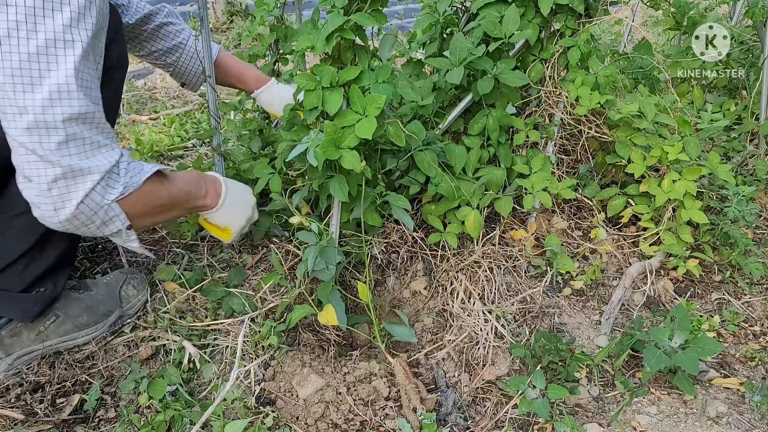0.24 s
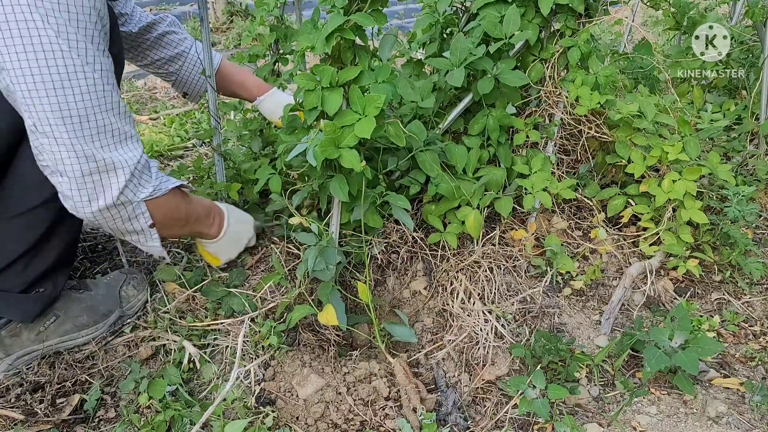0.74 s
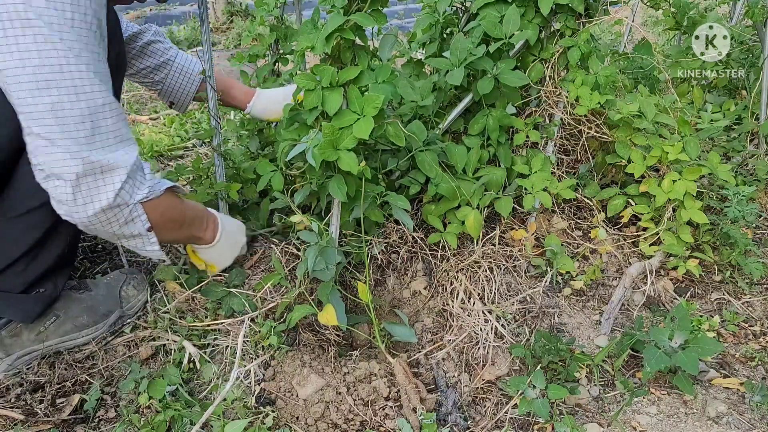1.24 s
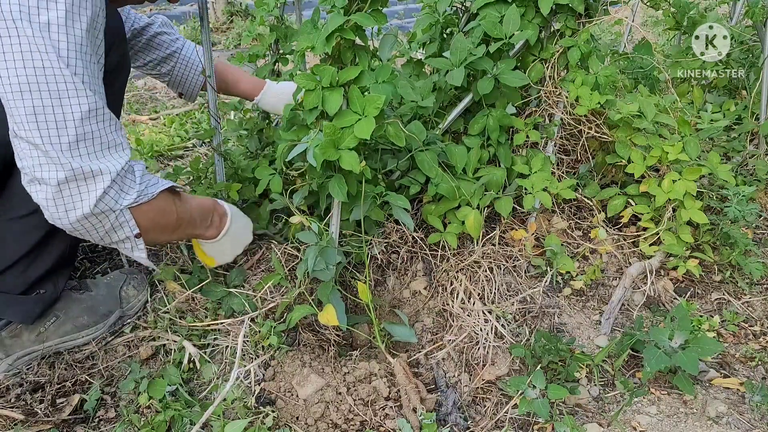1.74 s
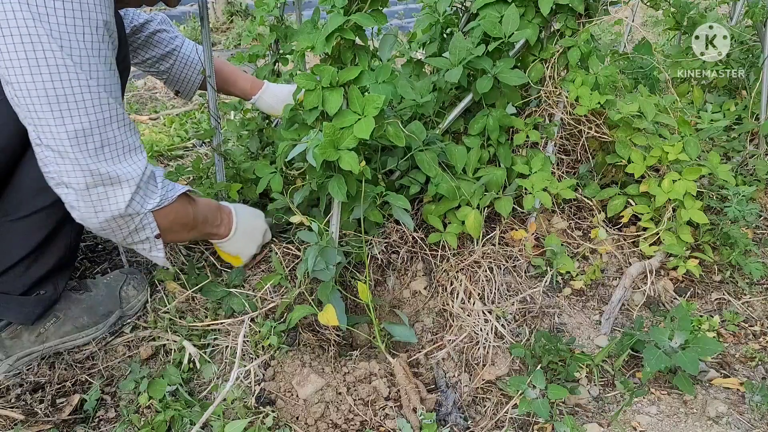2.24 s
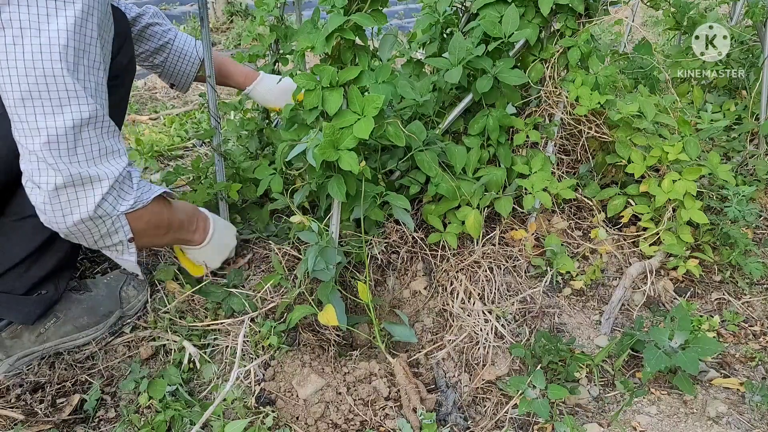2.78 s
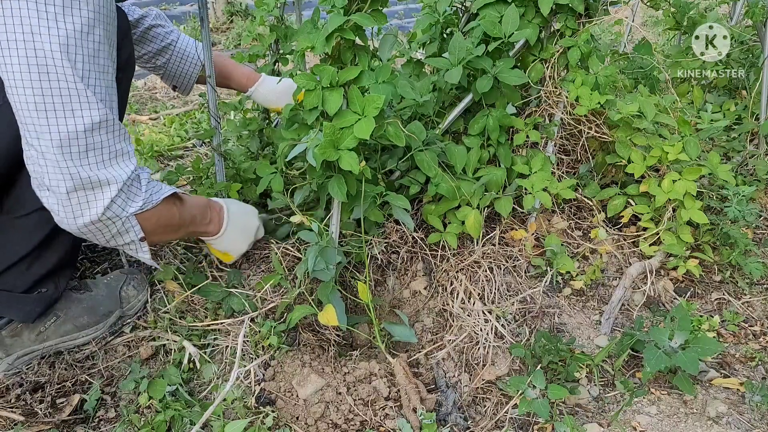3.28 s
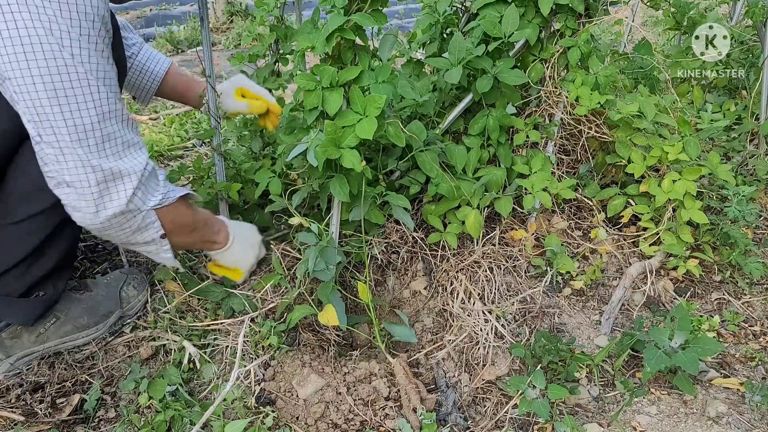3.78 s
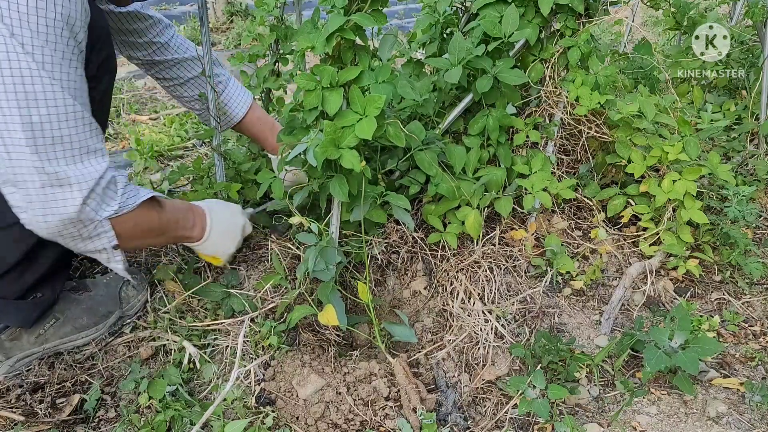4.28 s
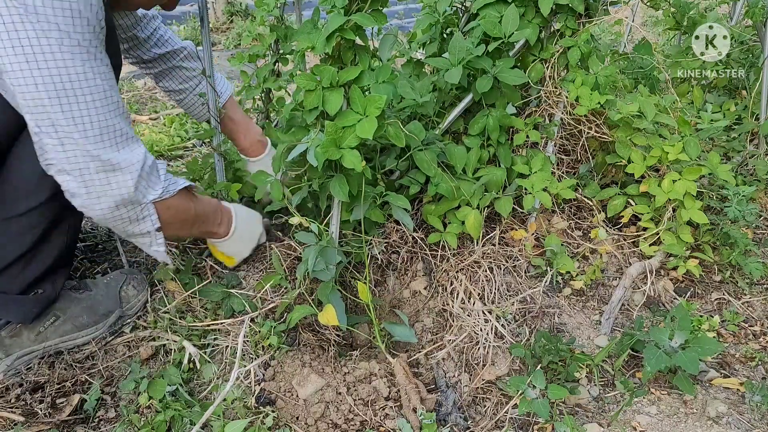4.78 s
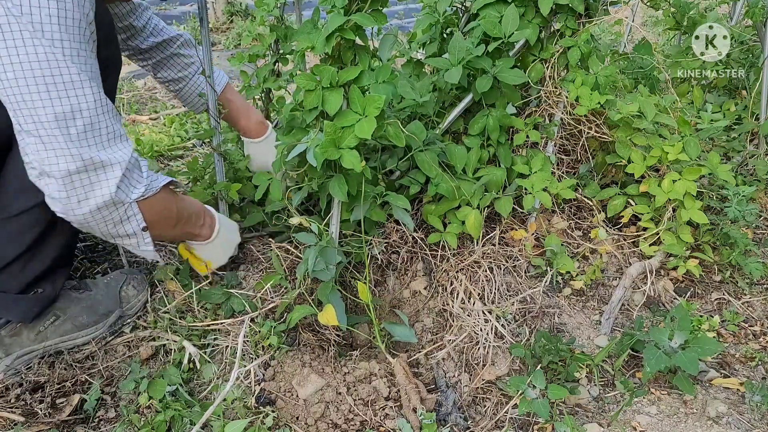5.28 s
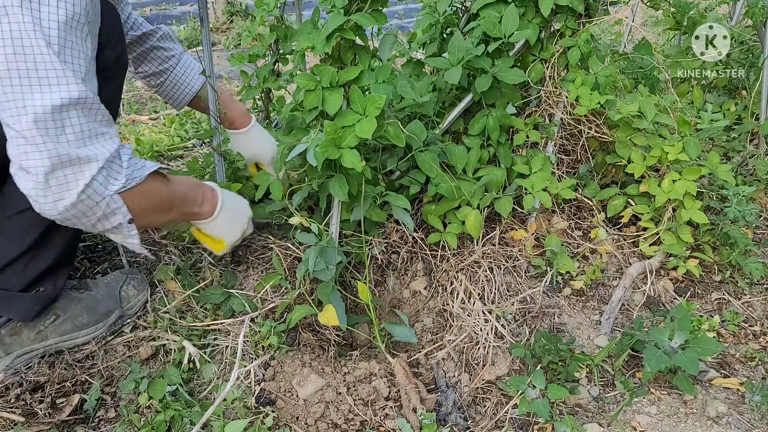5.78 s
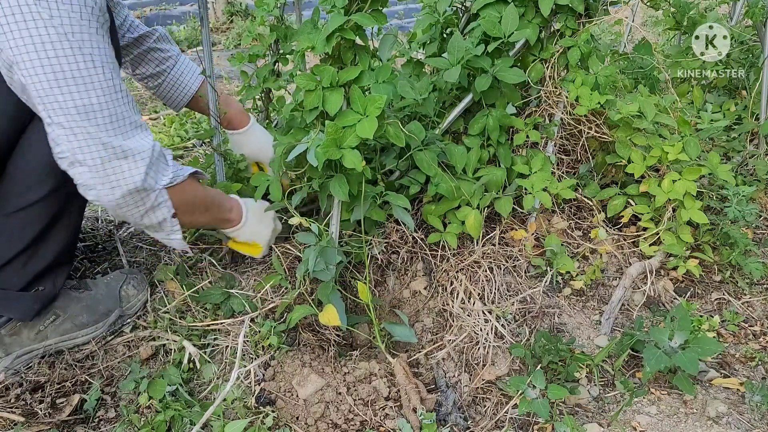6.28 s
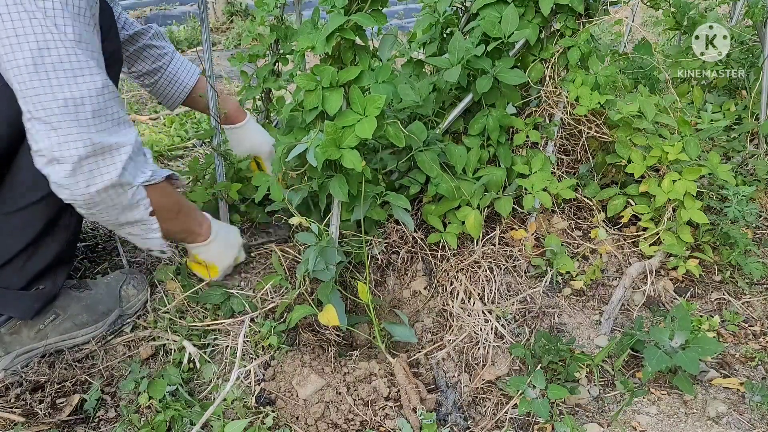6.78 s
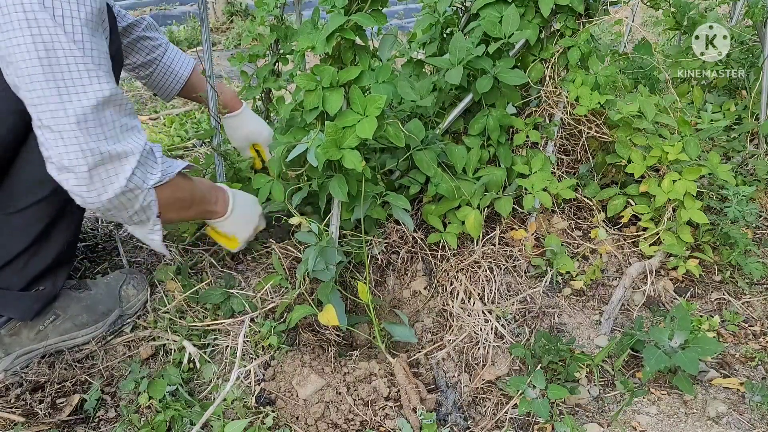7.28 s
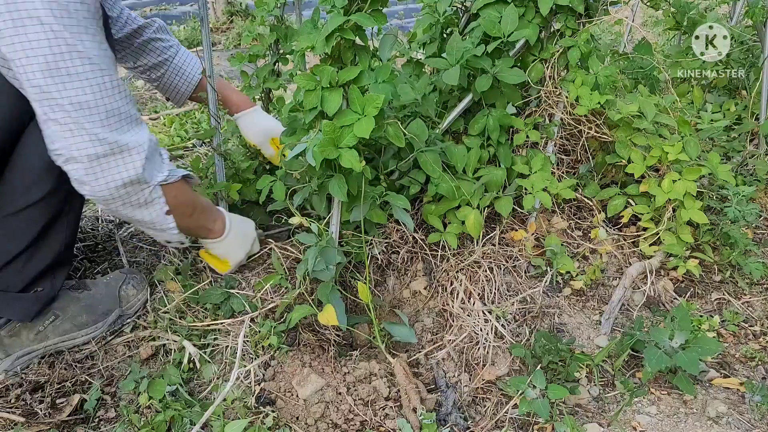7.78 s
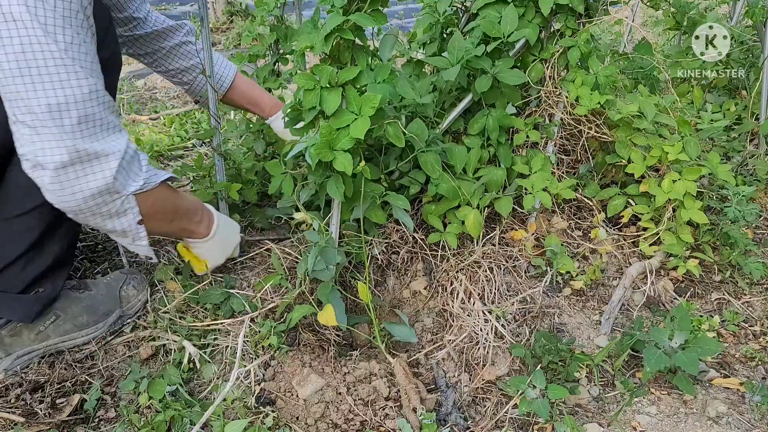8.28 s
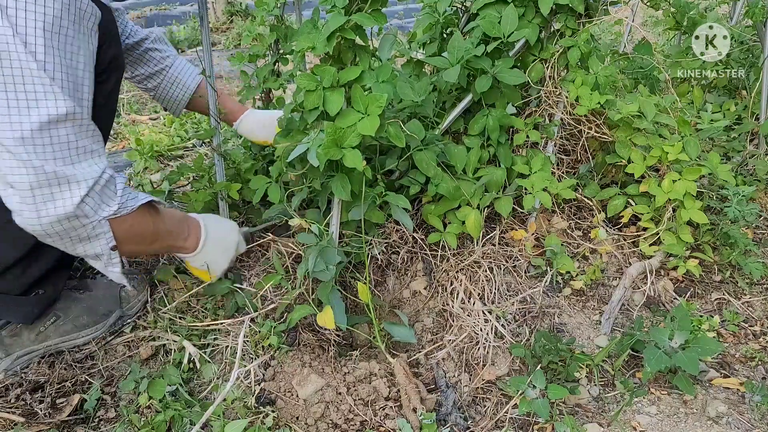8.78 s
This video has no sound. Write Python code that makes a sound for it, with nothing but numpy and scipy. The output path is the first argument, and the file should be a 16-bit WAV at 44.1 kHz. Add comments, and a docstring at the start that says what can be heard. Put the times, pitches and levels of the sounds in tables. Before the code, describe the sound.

Quick, uneven gardening strokes rasp through weeds and loose earth, stems cracking and the tool lightly thudding, against still outdoor air.

```python
"""A gardener's small steel cutting tool works through weeds at soil level, nearly three strokes a second.
Shaped noise and separate fractures make the crunch of dry stalks and crumbly earth; stems snap as short
ringing bursts, the tool bumps the ground as damped sines plus grit, and the blade rings in decaying modes.
Behind it: still outdoor air and stirring leaves as noise, a low harmonic hum, a far bird as gliding sines."""
import sys
import numpy as np
from scipy import signal
from scipy.fft import rfft, irfft
from scipy.io import wavfile
from scipy.ndimage import uniform_filter1d

SR = 44100
rng = np.random.default_rng(int(sys.argv[2]) if len(sys.argv) > 2 else 0)


def to_wav(s):
    """Save 16-bit WAV."""
    ch = np.atleast_2d(s).T  # columns
    pcm = np.round(np.clip(ch, -1, 1) * 32767)  # PCM
    wavfile.write(sys.argv[1], SR, pcm.astype(np.int16))


N = 398663

# spectral shape of dry stalks and leaves: [f/Hz, relative level/dB]
STALK_SPECTRUM = [(150, -31), (1200, -3), (2300, -4), (2850, 0.5), (4000, -4.5), (5300, -0.5), (6200, 0),
                  (7700, 0), (9300, -0.5), (11000, 2), (12300, -4), (14500, -4.5), (16000, -7.5)]
# spectral shape of crumbly soil and woody knocks: [f/Hz, relative level/dB]
SOIL_SPECTRUM = [(60, -11), (170, -7.5), (230, -7.5), (330, -6.5), (460, 0), (650, -5), (950, -6),
                 (1380, -6), (1700, -2), (2300, -9.5), (3200, -13), (6000, -15.5), (16000, -51)]
# modes of the free steel blade: [f/Hz, relative level/dB, t60/s]
BLADE_MODES = [(1377, 10.5, 0.053), (2735, -1.5, 0.19), (3057, 4, 0.14), (3800, 0, 0.17), (4380, -3, 0.23),
               (6950, -1.5, 0.28), (7580, 4, 0.037), (8400, 3, 0.15), (10600, -30, 0.091),
               (11700, 8, 0.071), (11700, -21, 0.072), (13800, -35, 0.11), (14630, -12, .12)]


def amp(db):
    """Decibels to gain."""
    return 10 ** (np.asarray(db) / 20)


def evened(x):
    """Scales to rms 1."""
    return x / np.sqrt(np.mean(x ** 2) + 1e-20)


def read(points, hz):
    """Interpolates a table on a log-frequency axis."""
    f, value = np.transpose(points)
    return np.interp(np.log(hz + 1), np.log(f + 1), value)


def add(mix, s, sound):
    """Mixes a sound in at time s, in place."""
    part = mix[max(round(s * SR), 0):][:len(sound)]
    part += sound[:len(part)]


def colour(x, spectrum, size=2048):
    """Minimum-phase FIR of unit energy with the given spectral shape."""
    hz = abs(np.fft.fftfreq(size, 1 / SR))
    log_gain = np.log(amp(read(spectrum, hz)))
    response = np.exp(np.conj(signal.hilbert(log_gain)))
    taps = np.fft.ifft(response).real[:size // 2]
    return signal.oaconvolve(x, taps[None] / np.linalg.norm(taps), axes=1)[:, :N]


def burst(power, spectrum):
    """Two unrelated noises that follow one power envelope, then are filtered by one spectrum."""
    envelope = np.sqrt(np.maximum(power, 0))
    return colour(envelope * rng.standard_normal((2, N)), spectrum)


def drift(per_s):
    """Slow chance of rms 1: sines of random phase up to per_s Hz, weaker as they get faster."""
    t = np.arange(0, N, 100) / SR
    rates_hz = np.geomspace(per_s / 10, per_s, 20)
    slow = sum(np.sin(2 * np.pi * (f * t + rng.random())) / np.sqrt(f) for f in rates_hz)
    return evened(np.interp(np.arange(N) / SR, t, slow))


def grains(per_s, spread_db, decay_s, smooth):
    """Power envelope of many tiny fractures of uneven size over a smooth rub; mean 1."""
    sizes = amp(spread_db * np.minimum(rng.exponential(1, N), 4)) ** 2
    sizes *= rng.random(N) < per_s / SR
    power = signal.lfilter([1], [1, -np.exp(-1 / (decay_s * SR))], sizes)
    power /= uniform_filter1d(power, size=2200) + power.mean() / 20  # levels out chance clusters
    share = np.clip(smooth, 0, 1)
    return share + (1 - share) * power / power.mean()


def fibres(per_s, spread_db, decay_s, count=16):
    """Separate little fractures, each a brief splinter of noise in one of count shapes; rms 1."""
    t, out = np.arange(160) / SR, np.zeros((2, N + 160))
    for shapes in rng.standard_normal((count, 2, len(t))) * np.exp(-t / decay_s):
        events = rng.random((round(per_s * N / SR / count), 2))  # position, size
        starts = (events[:, :1] * N).astype(int)
        size = amp(spread_db * np.minimum(-np.log(events[:, 1]), 2.5))
        for side, shape in zip(out, shapes):
            np.add.at(side, starts + np.arange(len(t)), size[:, None] * shape)
    out = out[:, :N]
    local = uniform_filter1d((out ** 2).mean(0), size=1500)
    return evened(out / np.sqrt(abs(local) + local.mean() / 10))


def ports(x, likeness):
    """Two unrelated signals become the partly alike, phase-shifted signals of two microphone ports."""
    # phase by which left leads right: [f/Hz, phase/rad]
    lead_points = [(100, 0.13), (480, .6), (1000, 2.85), (1400, 0.83), (1800, 1.4), (2300, 2.13),
                   (3000, 2.74), (3800, 2.93), (6000, 5.18), (8300, 4.7), (12000, 5)]
    # left minus right: [f/Hz, level/dB]
    balance_points = [(100, 1.1), (300, 2.9), (650, 4.1), (1400, 3.1), (2500, 2.1), (9000, 1.44),
                      (15000, 2.5)]
    hz, (a, b) = np.fft.rfftfreq(N, 1 / SR), rfft(x)
    same = np.clip(read(likeness, hz), 0, .98)
    lead = read(lead_points, hz)
    right = same * np.exp(-1j * lead) * a + np.sqrt(1 - same ** 2) * b
    tilt = amp(read(balance_points, hz) / 2)
    centre = np.sqrt((1 + same * np.cos(lead)) / 2)  # keeps the level of the ports' mean, tilt aside
    return irfft(np.array([a * tilt, right / tilt]) / centre, N)


def background(air_db=-66, leaves_db=-70):
    """Still air, and leaves that stir under the other hand: drifting noise, the leaves' part grainy."""
    # spectral shape of outdoor air: [f/Hz, relative level/dB]
    air_spectrum = [(15, -43), (30, -30), (45, 1), (65, 7), (95, 7.5), (160, -8.5), (220, -13.5),
                    (380, -4.5), (600, -5.5), (950, -11.5), (1500, -9), (2300, -13), (4800, -15.5),
                    (11000, -46), (15500, -65)]
    swell_db, stir_db = .3 * drift(3), 1.3 * drift(8)
    air = burst(amp(air_db + swell_db) ** 2, air_spectrum)
    ticks = grains(per_s=39, spread_db=-2.5, decay_s=0.0029, smooth=0.79)
    return air + burst(amp(leaves_db + stir_db) ** 2 * ticks, STALK_SPECTRUM)


def hum(hum_hz=120.6, hum_db=-64.5, overtone_db=-23):
    """Electric hum: harmonics 1 and 3-6 on a slightly wandering phase, opposite in sign left and right."""
    turn = 2 * np.pi * hum_hz * np.arange(N) / SR + .08 * drift(3)
    tone = np.sin(turn) + amp(overtone_db) * sum(np.sin(k * turn) for k in range(3, 7))
    return amp(hum_db) * evened(tone) * amp([[1.], [-1.]])


def garden(x, echo_db=-13, t60=0.049):
    """Leaves and ground scatter a short tail: decaying noise after a 3 ms gap."""
    t = np.arange(SR // 3) / SR
    tail = rng.standard_normal((2, len(t))) * amp(-60 * t / t60) * (t > .003)
    return amp(echo_db) * signal.oaconvolve(x, tail / np.linalg.norm(tail[0]), axes=1)[:, :N]


def bird(waver=0.014):
    """Thin far whistles: wavering sines that rise and level off, blurred by the foliage."""
    # whistles: [t/s, length/s, start f/Hz, end f/Hz, level/dB]
    whistle_rows = [(3.29, .08, 3930, 5300, -69), (4.656, .15, 4790, 5440, -71),
                    (7.677, .09, 3820, 4100, -71), (8.595, .065, 3800, 4550, -69),
                    (8.76, .04, 3900, 3980, -71)]
    out = np.zeros(N)
    for s, length, start_hz, end_hz, db in whistle_rows:
        u = np.linspace(0, 1, round(length * SR))
        glide_hz = end_hz + (start_hz - end_hz) * (1 - np.sin(np.pi * u / 2))
        hz = glide_hz * (1 + waver * drift(146)[:len(u)])
        envelope = amp(db) * np.sqrt(abs(np.sin(np.pi * u)))
        add(out, s, envelope * np.sin(2 * np.pi * np.cumsum(hz) / SR))
    far = np.array([out, out])
    return far + garden(far, echo_db=-1, t60=0.2)


def blade_ring(weights, damping):
    """Sum of the blade's decaying modes, one weight each; contact (damping > 1) shortens them."""
    t = np.arange(SR // 3) / SR
    return sum(w * amp(db - 60 * damping * t / t60) * np.cos(2 * np.pi * hz * t)
               for w, (hz, db, t60) in zip(weights, BLADE_MODES))


def blade(cutting, ring_db=-13, buried_damping=3.7, flick_db=3.0, scrape_s=0.013, octaves=0.06):
    """Buried in weeds the steel rings briefly; flicked free by a stalk it rings on, most near one pitch."""
    # flicks of the free blade: [t/s, level before flick_db/dB, favoured f/Hz]
    flick_rows = [(0.865, -63, 8400), (2.27, -67, 8450), (2.669, -62, 7300), (3.031, -65, 1390),
                  (3.042, -60, 11000), (4.359, -71, 8400), (5.203, -66, 8300), (6.442, -60, 7800),
                  (6.68, -59, 7000), (7.429, -65, 6650), (7.747, -63.5, 3100), (8.177, -58.5, 10800),
                  (8.953, -61.5, 3120)]
    out, mode_hz, t = np.zeros((2, N)), np.array(BLADE_MODES)[:, 0], np.arange(SR // 20) / SR
    for side, drive in zip(out, cutting):
        ring = blade_ring(np.ones(len(BLADE_MODES)), buried_damping)
        side += amp(ring_db) * signal.oaconvolve(drive, ring / np.linalg.norm(ring))[:N]
        for s, db, hz in flick_rows:
            scrape = rng.standard_normal(len(t)) * np.exp(-t / scrape_s)
            nearness = 1 / (1 + (np.log2(mode_hz / hz) / octaves) ** 2)
            free = blade_ring(.3 + .7 * nearness, 1)
            flick = signal.fftconvolve(free, scrape / np.linalg.norm(scrape))
            add(side, s, amp(db + flick_db) * flick)
    return out


def bumps(grit_db=-12, thud_db=-6, grit_s=0.002, thud_s=0.0034):
    """The tool meets packed earth: a dead thud of a damped sine, and a puff of noise as grit."""
    # bumps: [t/s, level before grit_db and thud_db/dB, thud f/Hz]
    bump_rows = [(0.203, -23, 486), (2.128, -35, 395), (2.509, -36, 513), (5.005, -34, 230),
                 (5.044, -31.5, 400), (6.5015, -27.5, 394), (6.519, -26.5, 470), (6.524, -22, 284),
                 (6.536, -32.5, 1550), (6.864, -21.5, 440), (6.888, -36, 380), (6.907, -39, 533),
                 (7.167, -33, 490), (7.228, -39, 450), (7.247, -44, 1560), (7.277, -38.5, 440),
                 (7.586, -24, 493), (8.381, -28, 1800)]
    # spectral shape of the grit: [f/Hz, relative level/dB]
    earth_spectrum = [(60, -16.5), (200, -2.5), (320, -11), (470, 11.5), (750, -18), (1400, -4),
                      (1900, -21), (3000, -13), (8000, -40), (16000, -74)]
    t, power, thuds = np.arange(SR // 16) / SR, np.zeros(N), np.zeros((2, N))
    for s, db, hz in bump_rows:
        add(power, s, amp(db + grit_db) ** 2 * np.exp(-t / grit_s))
        push = amp(db + thud_db) * (1 - np.exp(-2 * hz * t)) * np.exp(-t / thud_s)
        add(thuds[0], s, push * np.sin(2 * np.pi * hz * t))
    return burst(power, earth_spectrum) + thuds


def snaps(crack_db=-4.5, knock_db=0., stem_db=-4.5, stem_q=5.7, crack_s=0.002, tear_s=0.0024, tear_db=-14):
    """A stem breaks: a sharp crack, a woody knock and a short resonance; its last fibres tear more weakly."""
    # stem snaps: [t/s, level before mixing/dB, knock re crack/dB, length factor/1, stem f/Hz]
    snap_rows = [(.1437, -43.5, -10, .85, 11300), (0.1991, -33.5, -10.5, 1.6, 10700),
                 (0.56, -42.5, -6, 7.4, 6800), (0.9797, -32, -10.5, 0.72, 3370),
                 (1.3927, -34.5, -23, 1.7, 6260), (1.496, -48.5, -0.5, 0.91, 3770),
                 (1.705, -44, -12, 1.2, 11000), (1.7906, -36, -9.5, 1.6, 9100),
                 (1.7985, -37, -17, 0.31, 3630), (2.116, -44.5, -4, 3.7, 10500),
                 (2.1796, -48, -10, 1.9, 2640), (2.4123, -47, -23, 1.2, 4260),
                 (2.51, -33.5, -10.5, .83, 7900), (2.538, -47.5, -6.5, 3.8, 2680),
                 (2.6655, -51.5, -3, 2.6, 3800), (2.785, -34, -16, 2.4, 8400),
                 (2.84, -42, -4.5, 2.6, 10900), (3.178, -37.5, -3, .8, 9100),
                 (3.1921, -37.5, -5, 0.59, 1830), (3.485, -38, -2.5, 0.56, 9000),
                 (3.4883, -34, -16, 0.73, 13100), (3.9441, -32, -12, 0.54, 2920),
                 (4.045, -47, -4, 2.8, 3400), (4.0925, -26, -29, 0.57, 6700), (4.1206, -36, -32, 1, 8900),
                 (4.1374, -34, -33, .9, 11800), (4.145, -37.5, -27, 2.7, 12800),
                 (4.159, -39, -22, 1.3, 8200), (4.1899, -41.5, -24, 0.45, 6350), (4.532, -42, 0, 1.4, 2680),
                 (4.5973, -38, -25, 0.73, 2000), (4.6543, -46, -0.5, 0.6, 2750),
                 (4.9808, -40.5, -5, 3.1, 11300), (5.011, -34.5, -8.5, 1.6, 8500),
                 (5.042, -43.5, 3, 1.3, 1480), (5.325, -24, -19, 0.28, 6300), (5.501, -53.5, -9, 1.2, 4240),
                 (5.656, -37.5, -18, 0.77, 3460), (5.7747, -41, -19, 0.69, 9100),
                 (5.8193, -37.5, -12, 1.26, 2270), (6.138, -38, -4.5, 1.2, 1880),
                 (6.2092, -43.5, -3.5, 0.78, 3970), (6.5179, -41.5, -1.5, 0.88, 1970),
                 (6.6086, -36.5, -2.5, 0.75, 2520), (6.681, -50, -11, 1.1, 2660),
                 (7.229, -27.5, -6, 1.54, 8200), (7.242, -31.5, -25, .59, 9000),
                 (7.964, -34, -24, 1.9, 10300), (7.9744, -31, -3, 0.45, 3460), (8.3747, -36, -2, 3.5, 1880),
                 (8.3929, -18.5, -9, 0.3, 5000), (8.7262, -56, -7.5, 3.8, 4200)]
    # spectral shape of the crack: [f/Hz, relative level/dB]
    crack_spectrum = [(150, -70), (1000, -8), (2600, -3), (4000, -4), (5400, 13), (7500, 17), (10500, 17),
                      (13000, 9.5), (16000, -4)]
    t, crack, knock, stems = np.arange(SR // 16) / SR, np.zeros(N), np.zeros(N), np.zeros((2, N))
    for s, db, wood_db, length, hz in snap_rows:
        age = t / max(length, .1)
        tear = amp(tear_db) ** 2 * np.exp(-age / tear_s)
        power = amp(db) ** 2 * (np.exp(-age / crack_s) + tear)
        add(crack, s, power)
        add(knock, s, power * amp(wood_db) ** 2)
        for side in stems:
            noise = np.sqrt(power) * rng.standard_normal(len(t))
            ring = signal.lfilter(*signal.iirpeak(hz, stem_q, SR), noise)
            add(side, s, evened(ring) * np.sqrt(power.mean()))
    cracks = amp(crack_db) * burst(crack, crack_spectrum)
    knocks = amp(knock_db) * burst(knock, SOIL_SPECTRUM)
    return cracks + knocks + amp(stem_db) * stems


def swell(t, s, hold, rise, fall, slope_db=20):
    """Blade pressure: builds to time s, holds, lets go; rise and fall are seconds per slope_db."""
    early, late = np.maximum(s - t, 0), np.maximum(t - s - hold, 0)
    return amp(-slope_db * (early / max(rise, .003) + late / max(fall, .003)))


def drag(catch_db=2.0, catches_per_s=70, rest_stalk_db=-96.5, rest_soil_db=-71.5):
    """Blade force on stalks and on soil: the strongest stroke or brush, catching and slipping at random."""
    # bites into the weeds: [t/s, hold/s, rise/s, fall/s, stalk level/dB, soil level/dB], before mixing
    stroke_rows = [(.198, 0.0097, .07, 0.089, -46, -47.5), (.568, 0.018, 0.083, 0.069, -44, -48.5),
                   (.975, 0.004, 0.092, 0.071, -46.5, -51), (1.395, 0.011, 0.052, .09, -44.5, -51),
                   (1.793, 0.0065, 0.078, 0.039, -43.5, -48.5), (2.11, .07, 0.18, .03, -51.5, -54),
                   (2.464, 0.056, 0.033, 0.048, -48.5, -51), (2.838, 0.046, 0.12, 0.048, -46, -52),
                   (3.193, 0.022, 0.061, 0.052, -48.5, -51), (3.487, 0.0061, 0.0084, 0.22, -46.5, -54),
                   (3.94, 0.014, 0.091, 0.11, -51, -51.5), (4.098, 0.061, 0.12, 0.048, -45.5, -62),
                   (4.575, 0.046, 0.12, 0.065, -49.5, -54.5), (4.985, 0.073, 0.061, 0.028, -51, -54),
                   (5.39, 0.019, 0.047, .06, -50, -49.5), (5.755, 0.013, 0.042, 0.049, -39, -45),
                   (6.13, 0.06, 0.016, 0.072, -51, -51.5), (6.518, .012, 0.054, 0.1, -48.5, -48.5),
                   (6.88, 0.02, 0.062, 0.083, -42.5, -42.5), (7.229, 0.0059, .015, 0.089, -39.5, -40),
                   (7.586, 0.0077, 0.11, 0.085, -45, -46.5), (7.973, 0.004, 0.043, 0.063, -41.5, -45),
                   (8.379, 0.0092, 0.041, .045, -48, -51), (8.537, 0.0038, 0.038, 0.08, -44.5, -52.5)]
    # litter brushed as the blade is set down or drawn back:
    # [t/s, length/s, stalk level/dB, soil level/dB], before mixing
    brush_rows = [(0.099, 0.096, -54, -49), (0.122, 0.23, -54, -50.5), (0.28, 0.056, -48.5, -53),
                  (0.502, 0.048, -49, -52.5), (0.869, 0.031, -43.5, -46), (1.332, 0.063, -55.5, -56.5),
                  (1.453, .06, -61, -52.5), (1.696, .06, -51.5, -53.5), (1.938, .08, -60, -70),
                  (2.035, .1, -65, -66), (2.409, 0.099, -55, -57.5), (2.796, .07, -46, -50),
                  (3.147, 0.053, -49, -51), (3.572, .1, -50.5, -54), (3.88, 0.11, -52, -55),
                  (4.271, 0.15, -52.5, -51.5), (4.364, 0.1, -53.5, -70), (4.532, 0.023, -58, -44.5),
                  (4.925, 0.069, -57, -56), (5.086, 0.037, -45.5, -57), (5.329, 0.083, -45, -56),
                  (5.664, 0.096, -51, -53), (5.835, 0.11, -51.5, -51.5), (6.058, 0.29, -53, -56),
                  (6.437, 0.067, -51.5, -55.5), (6.803, 0.068, -51.5, -54), (7.166, 0.2, -56.5, -60),
                  (7.318, 0.082, -55, -55), (7.444, 0.21, -58.5, -57.5), (7.496, 0.11, -55, -59),
                  (7.778, 0.3, -60, -60), (7.836, 0.42, -56, -58.5), (8.179, 0.32, -57.5, -63.5),
                  (8.265, .16, -55, -51.5), (8.321, 0.073, -45, -48), (8.457, 0.39, -67, -57.5),
                  (8.948, 0.45, -59, -63)]
    rise_share, fall_share = 0.29, 0.63  # of a brush's length
    t = np.arange(0, N, 32) / SR
    brushes = [(s, 0, rise_share * length, fall_share * length, stalk_db, soil_db)
               for s, length, stalk_db, soil_db in brush_rows]
    force = amp([[rest_stalk_db], [rest_soil_db]])  # the tool never quite leaves the litter
    for s, hold, rise, fall, stalk_db, soil_db in list(stroke_rows) + brushes:
        force = np.maximum(force, amp([[stalk_db], [soil_db]]) * swell(t, s, hold, rise, fall))
    knots = np.arange(0, N / SR, 1 / catches_per_s)
    catch = evened(amp(catch_db * np.interp(t, knots, rng.uniform(-2, 2, len(knots)))))
    return [np.interp(np.arange(N) / SR, t, level * catch) for level in force]


def strokes(rub_db=-3.5, fibre_db=-9.5, soil_db=-4., crumb_db=-7.5, splinter_s=.00045):
    """The blade rubs through stalks and soil as noise; fibres part and crumbs break as splinters."""
    stalk, soil = drag()
    rub = burst(stalk ** 2, STALK_SPECTRUM)
    grit = grains(per_s=440, spread_db=5.5, decay_s=0.00066, smooth=0.26)
    grind = burst(soil ** 2 * grit, SOIL_SPECTRUM)
    crackle = colour(stalk * fibres(per_s=330, spread_db=5.5, decay_s=splinter_s), STALK_SPECTRUM)
    crumbs = colour(soil * fibres(per_s=170, spread_db=-0.5, decay_s=splinter_s), SOIL_SPECTRUM)
    return amp(rub_db) * rub + amp(fibre_db) * crackle + amp(soil_db) * grind + amp(crumb_db) * crumbs


def shifting_colour(x, count=12, depth=.75, span_s=.0016, turn_s=.014):
    """The blade meets one stalk after another: a random short hollow resonance every turn_s."""
    t, out = np.arange(256) / SR, np.zeros((2, N))
    stalk = rng.integers(0, count, N)[(np.arange(N) / SR / turn_s).astype(int)]
    for k in range(count):
        body = rng.standard_normal(len(t)) * np.exp(-t / span_s)
        body *= depth / np.linalg.norm(body)
        body[0] = 1  # direct sound
        out += signal.oaconvolve(x * (stalk == k), body[None] / np.linalg.norm(body), axes=1)[:, :N]
    return out


def scene():
    """The work close by on the left, the garden all around."""
    # likeness of the ports for near and for far sound, clipped to 0-0.98 in use: [f/Hz, likeness/1]
    near_same = [(100, .97), (600, 1), (1000, -1.15), (1400, 0.64), (2000, 0.74), (3700, 0.27), (5800, 1.7),
                 (7600, -0.7), (10000, .5), (15000, -0.4)]
    far_same = [(150, 0.53), (300, 0.043), (850, 0.6), (1400, 0.057), (3000, 0.22), (6000, 0.29)]
    cutting = shifting_colour(strokes()) + snaps() + bumps()
    near = ports(cutting + blade(cutting), near_same)
    far = ports(garden(cutting) + background(), far_same)
    return near + far + hum() + bird()


def record(dry, edge_hz=15850):
    """The recorder's band limit: a linear-phase low-pass."""
    taps = signal.firwin(511, edge_hz, window=("kaiser", 9), fs=SR)
    return signal.oaconvolve(dry, taps[None], "same")


dry = scene()
out = record(dry)
to_wav(out)
```